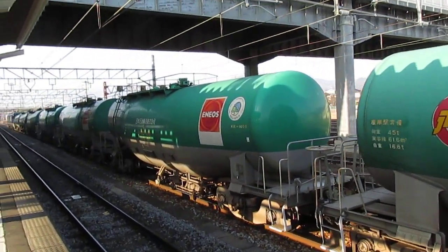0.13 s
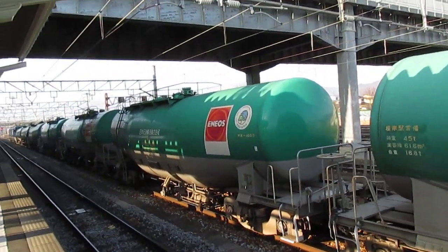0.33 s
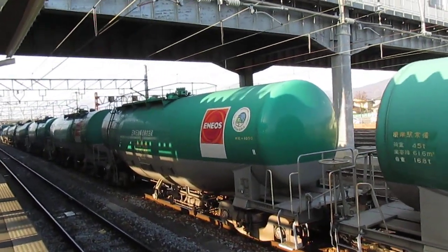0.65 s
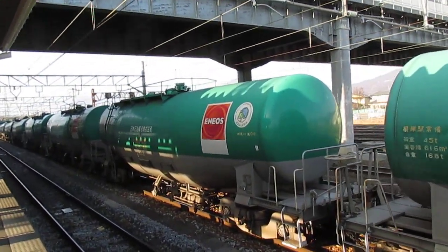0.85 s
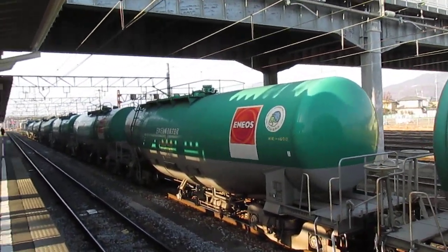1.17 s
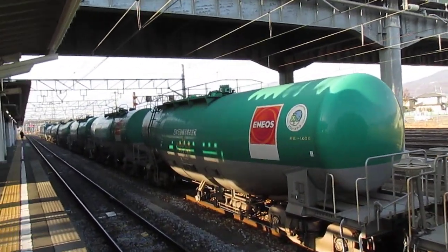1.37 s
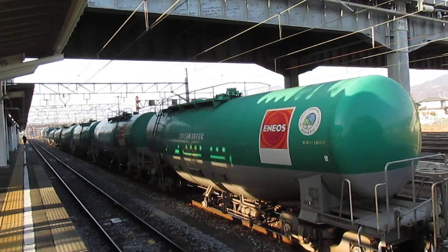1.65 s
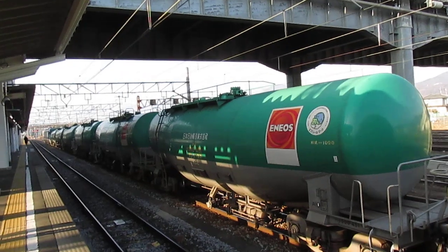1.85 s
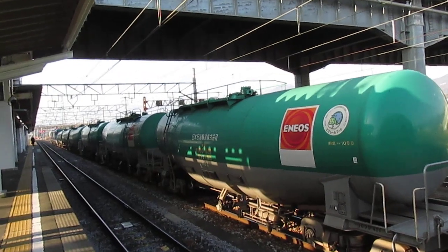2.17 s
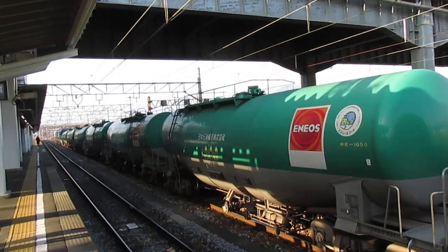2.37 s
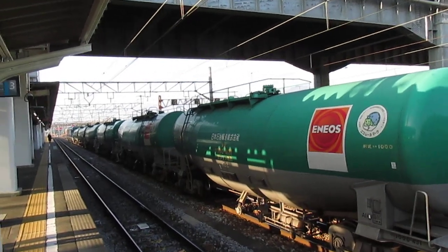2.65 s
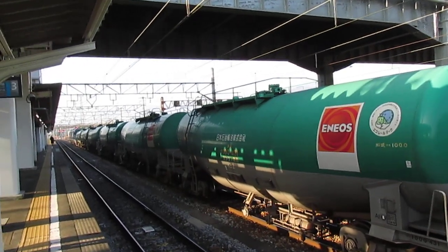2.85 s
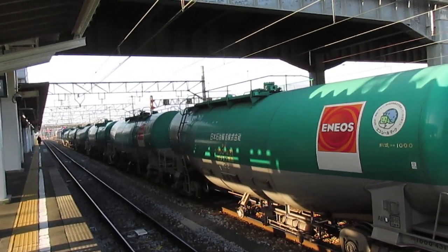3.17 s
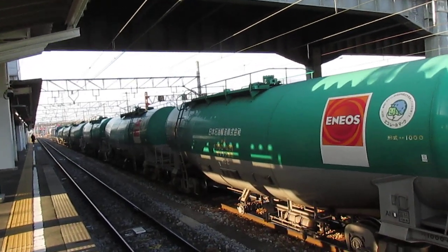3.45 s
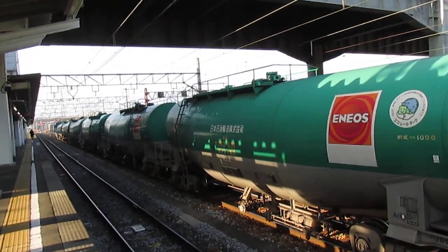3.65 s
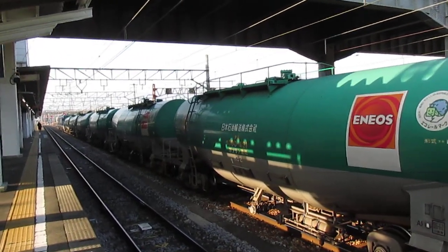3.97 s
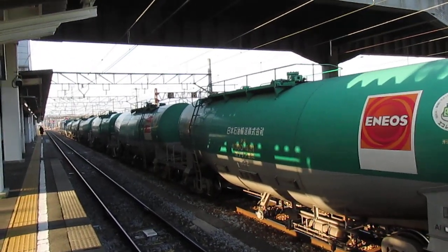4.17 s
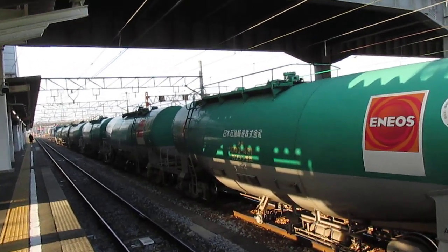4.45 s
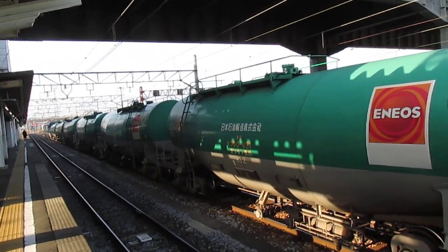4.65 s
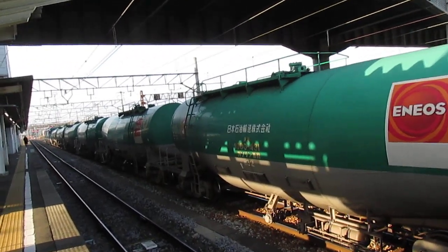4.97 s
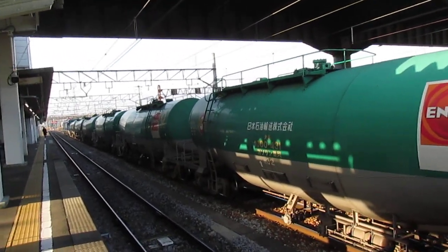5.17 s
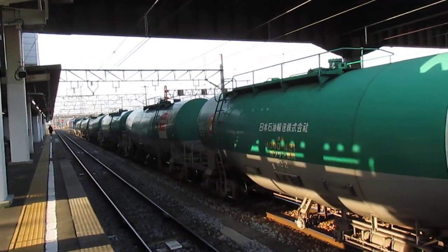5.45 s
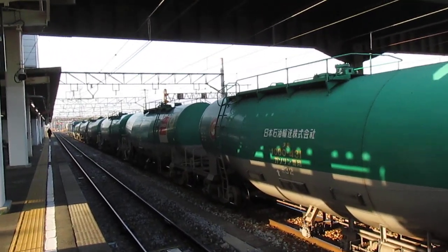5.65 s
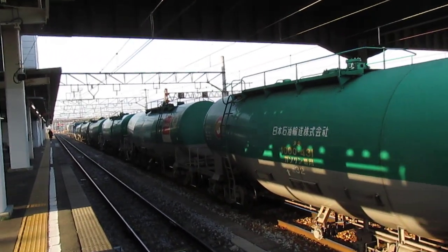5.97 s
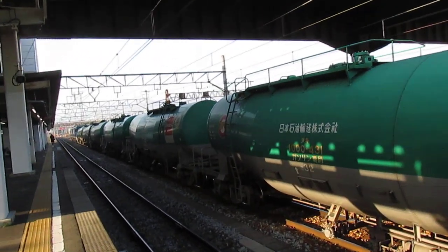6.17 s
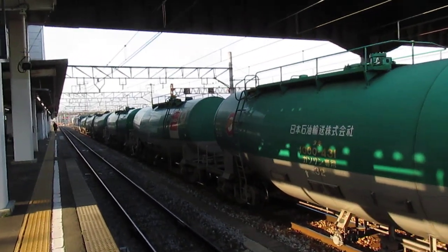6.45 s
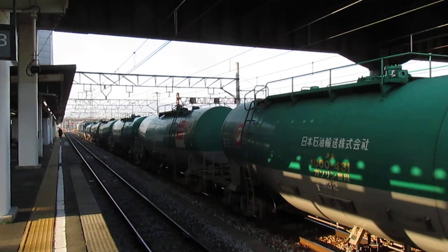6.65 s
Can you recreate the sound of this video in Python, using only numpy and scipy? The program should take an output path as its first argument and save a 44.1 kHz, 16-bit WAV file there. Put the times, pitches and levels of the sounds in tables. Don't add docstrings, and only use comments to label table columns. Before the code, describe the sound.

A bright hiss of escaping air from a standing tank train's brakes slowly dulls, joined by a breathy pipe hoot and thudding wind gusts.

```python
import sys
import numpy as np
from scipy import signal
from scipy.fft import rfft, irfft, next_fast_len
from scipy.io import wavfile
from scipy.ndimage import uniform_filter1d

SR = 44100
rng = np.random.default_rng(int(sys.argv[2]) if len(sys.argv) > 2 else 0)


def transcribe(u):
    v = np.clip(np.atleast_2d(u).T, -1, 1)
    q = np.round(v * 32767).astype(np.int16)
    wavfile.write(sys.argv[1], SR, q)


def invert_db(level):
    return 10 ** (np.asarray(level, dtype=float) / 20)


N = 300758
LONG = next_fast_len(N)
HZ = np.maximum(np.arange(LONG // 2 + 1) * SR / LONG, 1)

# frequency in Hz, density in dB per Hz.
YARD_COLOUR = [(18, -35), (30, -3.5), (254, -8), (352, -10.5), (509, -6), (792, -9), (900, 4), (1170, -39),
               (1980, -120)]
# frequency in Hz, density in dB per Hz.
SWELL_COLOUR = [(150, -39), (230, -4), (330, -8), (520, -2.5), (750, -9), (1100, -11)]
# start in seconds, hold in seconds, level in dB.
COUPLING_SWELLS = [
    (1.98, .02, -38),
    (4.1, .03, -49.5),
    (5.5, 0.4, -43),
]
# start in seconds, hold in seconds, level in dB.
GUSTS = [(.03, 0.0082, -38), (.865, .025, -34), (.98, 0.043, -33.5), (1.13, 0.016, -40), (1.23, 0.23, -46),
         (1.46, .04, -39), (2.05, 0.29, -44.5), (2.44, 0.012, -34), (2.55, .25, -39.5), (2.76, 0.04, -37),
         (2.9, .02, -45), (3.15, .1, -41), (3.35, .02, -47), (3.43, 0.22, -39.5), (3.92, 0.11, -38),
         (4.11, 0.028, -37.5), (4.28, 0.097, -40.5), (4.57, 0.027, -46), (4.69, 0.13, -44),
         (5.12, 0.2, -36), (5.18, 0.036, -34), (5.58, .04, -48), (5.85, .02, -42), (5.98, 0.033, -34),
         (6.1, .06, -40), (6.19, 0.044, -32.5), (6.39, .04, -35.5), (6.54, 0.033, -34), (6.6, 0.026, -44)]
# start in seconds, peak in dB, final pitch in Hz.
EDDIES = [(0.175, -60, 141), (0.865, -25.5, 117), (0.983, -35, 64), (1.415, -47, 75.4), (2.573, -34, 67.9),
          (2.782, -28.5, 84.5), (2.88, -42, 63.4), (3.417, -32, 77.6), (3.766, -44, 96.9),
          (3.928, -30, 116), (4.106, -31.5, 139), (4.286, -34, 81.6), (4.786, -37, 63), (5.156, -29, 161.6),
          (5.156, -38, 66.9), (5.836, -50, 75.2), (5.972, -29, 80.3), (6.18, -28, 95.5), (6.389, -35, 101),
          (6.541, -25, 73.5)]

# frequency in Hz, density in dB per Hz.
ROAR_COLOUR = [(320, -65), (550, -17), (615, -13), (680, -19), (797, -5.5), (895, -14), (974, -6),
               (1260, 1.5), (1480, -3), (1710, -12.5), (1950, -57), (2540, -37), (4290, -120)]
# frequency in Hz, density in dB per Hz.
UPPER_COLOUR = [(1030, -1), (1750, -1.5), (2310, -2), (2590, 4.5), (2780, 2.5), (3340, -10.5),
                (3710, -14.5), (3900, -10.5), (5070, -18), (8580, -120)]
# start in seconds, hold in seconds, level in dB.
UPPER_SWELLS = [
    (2.3, 0.99, -37.5),
    (5.2, 0.88, -38),
]
# time in seconds, pitch in Hz.
HOOT_HZ = [(0, 1170), (2.7, 1172), (3.7, 1148), (4.8, 1122), (5.4, 1110), (6.0, 1160), (6.82, 1170)]
# start in seconds, hold in seconds, level in dB.
HOOT_SPELLS = [
    (1.8, 0.23, -36.5),
    (2.8, 1.77, -28),
    (3.55, 0.15, -28),
    (4.5, 0.25, -31.5),
    (5.0, 0.49, -29.5),
    (6.2, .7, -33.5),
]
# start in seconds, hold in seconds, level in dB.
SHOULDER_SPELLS = [
    (1.7, 0.41, -36.5),
    (2.7, 0.44, -37),
    (4.0, 0.42, -35),
    (4.8, 1.2, -33.5),
]

# time in seconds, hiss level in dB.
FAR_DB = [(0, -55), (1, -35), (2, -32.5), (4, -33), (5.1, -32.5), (5.6, -36), (6.82, -43.5)]
# frequency in Hz, density in dB per Hz.
FAR_COLOUR = [(3000, -24), (3300, -11), (3700, -11), (4500, -10), (5150, -1), (6000, -5.5), (7000, -6),
              (7600, -1.5), (9200, -2), (10200, -9.5), (11000, -6), (11900, -8.5), (13000, -6),
              (15800, -11)]
# time in seconds, jet level in dB.
JET_DB = [(0, -25.5), (1.2, -28.5), (1.9, -31), (3.1, -39.5), (4.2, -49), (5.4, -41.5), (6.82, -39.5)]
# frequency in Hz, density in dB per Hz.
JET_COLOUR = [(3000, -30), (3300, -18), (3850, -21), (4200, -7), (4700, -3.5), (5250, -1), (6300, -2.5),
              (7000, -7), (9200, -5), (10250, -11), (11000, -6.5), (12000, -8.5), (13500, -3.5),
              (15800, -7.5)]
# time in seconds, pitch in Hz.
MID_HZ = [(0, 5180), (.7, 5176), (1.7, 5340), (2.8, 5320), (3.6, 5208), (5.5, 5195), (6.2, 5210),
          (6.82, 5230)]
# start in seconds, hold in seconds, level in dB.
MID_SPELLS = [(.7, 0.94, -36.5), (1.6, .6, -36), (2.9, 0.62, -32), (3.9, 0.36, -37.5), (4.5, 0.98, -40.5),
              (6.2, 0.084, -41)]
# time in seconds, pitch in Hz.
TOP_HZ = [(0, 10920), (2, 10920), (3, 10850), (6.82, 10820)]
# start in seconds, hold in seconds, level in dB.
TOP_SPELLS = [(0, .05, -38), (.6, .5, -49), (1.4, .8, -37.5), (2.6, 0.86, -45), (5.3, .05, -46),
              (5.8, 1.2, -50)]
# start in seconds, end in seconds, first pitch in Hz, last pitch in Hz, level in dB.
LEAKS = [(0, 1.7, 6400, 5960, -53), (0, 1.6, 13550, 13300, -41), (0, 1.0, 14650, 14550, -42),
         (0, 2.5, 9450, 9150, -45), (.2, 1.4, 13000, 12650, -46), (.6, 1.6, 15050, 14850, -39),
         (.7, 1.2, 8500, 8350, -48), (1.4, 2.9, 2120, 2090, -41.5), (2.0, 2.64, 9160, 9160, -41),
         (2.8, 3.7, 12750, 12700, -46), (2.8, 4.2, 8400, 8050, -45), (3.2, 5.2, 7700, 7400, -42.5),
         (3.3, 4.7, 15200, 15000, -50), (3.9, 4.9, 14250, 14500, -49), (4.7, 5.8, 15000, 14900, -46),
         (5.0, 6.3, 12850, 12600, -52)]

# time in seconds, left lag of the jet in samples.
LAG = [(0, -.8), (1.2, -.5), (2.2, .6), (3.6, 1.0), (5.0, 1.7), (6.2, 3.3), (6.82, 3.6)]
# frequency in Hz, common share of power from 0 to 1.
LIKENESS = [(60, 0.75), (500, 0.97), (1200, 0.73), (2000, 0.67), (3200, 0), (4500, 0.44), (6200, 0.45),
            (7300, 0.22), (11000, 0.57), (15000, 0.43)]
# delay in ms, change of delay in % per
ECHOES = [(.8, 4.0, .3), (1.7, 2.2, -.5), (2.6, 3.4, .3), (3.9, 1.2, 0), (5.3, 2.1, -.4), (7.1, .7, .6),
          (9.7, 1.5, -.6), (13.4, .5, .3)]

YARD_DB = -44
ROAR_DB, ROAR_RISE_DB_PER_S, ROAR_YIELD_DB, HOOT_FULL_DB = -30.5, 0.28, 5, -24.5
UPPER_DB, UPPER_HOLD_S, UPPER_SAG_DB_PER_S = -31.5, 0.39, 1.43
SHOULDER_HZ = 1400
LEAK_WIDTH_SHARE = 0.017
JET_PAN_DB, JET_PAN_DB_PER_LAG, JET_ECHO_DB = 1.5, -0.5, -7
PIPE_PAN_DB, PIPE_PAN_DB_PER_LAG, PIPE_ECHO_DB = -1.8, -0.62, -11
PIPE_LAG_SHIFT_SAMPLES, PIPE_LAG_SCALE = -.7, 1.25
DIRECT_DB, OFF_AXIS_FROM_LAG, OFF_AXIS_DB_PER_LAG = 2.5, 0.53, 1.5
NOTCH_HZ, NOTCH_WIDTH_HZ = 7881, 190


def in_time(rows):
    s, *columns = np.transpose(rows)
    return [np.interp(np.arange(N) / SR, s, c) for c in columns]


def at_hz(points, outside=None):
    hz, value = np.transpose(points)
    return np.interp(np.log(HZ), np.log(hz), value, left=outside, right=outside)


def rms_one(x):
    return x / np.sqrt(np.mean(x ** 2) + 1e-20)


def drift(rate_hz, size=N):
    r = np.exp(-80 * np.pi * rate_hz / SR)
    white = rng.standard_normal(size // 40 + 2002)
    slow = signal.lfilter([1], [1, -2 * r, r * r], white)[2000:]
    return np.interp(np.arange(size) / 40, np.arange(len(slow)), rms_one(slow))


def spells(rows, rise_db_per_s, fall_db_per_s, rest_db):
    t = np.arange(0, N + 40, 40) / SR
    start, hold, db = np.transpose(rows)[..., None]
    rise_db = rise_db_per_s * np.maximum(start - t, 0)
    fall_db = fall_db_per_s * np.maximum(t - start - hold, 0)
    power = np.sum(invert_db(2 * (db - rise_db - fall_db)), axis=0) + invert_db(2 * rest_db)
    return np.interp(np.arange(N) / SR, t, 10 * np.log10(power))


def hiss(gain):
    alike = np.clip(at_hz(LIKENESS), 0, 1)
    spectrum = rfft(rng.standard_normal((3, LONG))) * gain
    parts = irfft(spectrum * np.sqrt([alike, 1 - alike, 1 - alike]), LONG)[:, :N]
    return parts / np.sqrt(np.mean(parts[0] ** 2 + parts[1] ** 2))


def coloured(colour, level_db, flicker_db):
    flutter_db = flicker_db * (drift(6.6) + drift(1.5))
    return invert_db(level_db + flutter_db) * hiss(invert_db(at_hz(colour, outside=-90)))


def whistle(hz, level_db, width_hz, flicker_db):
    n, long = len(hz), next_fast_len(len(hz))
    offset_hz = np.arange(long // 2 + 1) * SR / long
    band = 1 / (1 + (2 * offset_hz / width_hz) ** 2)
    slow = irfft(rfft(rng.standard_normal((2, 3, long))) * band, long)[..., :n]
    phase = 2 * np.pi * np.cumsum(hz) / SR
    parts = rms_one(slow[0] * np.cos(phase) + slow[1] * np.sin(phase))
    alike = np.clip(np.interp(np.mean(hz), *np.transpose(LIKENESS)), 0, 1)
    level = invert_db(level_db + flicker_db * drift(9.4, size=n))
    return level * parts * np.sqrt([[alike], [1 - alike], [1 - alike]])


def at_pair(parts, pan_db, lag, direct_db, echo_db):
    fine = irfft(rfft(parts[0], LONG), 8 * LONG) * 8
    now = np.arange(N)

    def delayed(samples):
        return fine.take((8 * (N + now - samples)).astype(int), mode="wrap")

    ports = []
    for side, scattered in zip((1, -1), parts[1:]):
        port = delayed(side * lag / 2)
        for ms, slide, extra in ECHOES:
            path = ms * SR / 1000 * (1 + slide / 100 * now / SR)
            port += invert_db(echo_db) * delayed(path + side * (lag + extra) / 2)
        port /= np.sqrt(1 + len(ECHOES) * invert_db(2 * echo_db))
        mixed = port * invert_db(direct_db / 4) + scattered * invert_db(-direct_db * .75)
        ports.append(mixed * invert_db(side * pan_db / 2))
    return np.array(ports)


def yard():
    swell_db = spells(COUPLING_SWELLS, rise_db_per_s=150, fall_db_per_s=20, rest_db=-53.5)
    rumble = coloured(YARD_COLOUR, YARD_DB, flicker_db=0.6)
    rumble = rumble + coloured(SWELL_COLOUR, swell_db, flicker_db=1.1)
    return (rumble[0] + rumble[1:]) * invert_db(np.array([[-.7], [.7]]))


def wind():
    gust_db = spells(GUSTS, rise_db_per_s=450, fall_db_per_s=300, rest_db=-63.5)
    white = rng.standard_normal((2, N))
    deep_band = signal.butter(2, [26, 100], "band", fs=SR, output="sos")
    bright_band = signal.butter(3, [80, 180], "band", fs=SR, output="sos")
    deep = rms_one(signal.sosfilt(deep_band, white[0]))
    bright = rms_one(signal.sosfilt(bright_band, white[1]))
    lumps = deep + invert_db(.5 * (gust_db + 33.5) - 15.5) * bright
    lumps /= np.sqrt(uniform_filter1d(lumps ** 2, size=2200) + 0.051)
    push = invert_db(gust_db + 4.0) * lumps
    t = np.arange(int(.06 * SR)) / SR
    for s, peak_db, hz in EDDIES:
        phase = 2 * np.pi * hz * (t + .006 * (1 - np.exp(-t / .006)))
        thud = invert_db(peak_db + 3.5) * np.sin(phase) * np.exp(-t / 0.047)
        i = int(s * SR)
        push[i:i + len(t)] += thud[:N - i]
    return push * [[-.37], [1]]


def pipe(lag):
    t = np.arange(N) / SR
    hoot_db = spells(HOOT_SPELLS, rise_db_per_s=35, fall_db_per_s=25, rest_db=-61)
    roar_db = ROAR_DB + ROAR_RISE_DB_PER_S * t - ROAR_YIELD_DB * invert_db(hoot_db - HOOT_FULL_DB)
    roar = coloured(ROAR_COLOUR, roar_db, flicker_db=0.05)
    sinking_db = UPPER_DB - UPPER_SAG_DB_PER_S * np.maximum(t - UPPER_HOLD_S, 0)
    again_db = spells(UPPER_SWELLS, rise_db_per_s=12, fall_db_per_s=5.5, rest_db=-56)
    upper_db = 10 * np.log10(invert_db(2 * sinking_db) + invert_db(2 * again_db)) + 1.0
    upper = coloured(UPPER_COLOUR, upper_db, flicker_db=0.8)
    hoot = whistle(*in_time(HOOT_HZ), hoot_db, width_hz=59, flicker_db=0.0)
    shoulder_db = spells(SHOULDER_SPELLS, rise_db_per_s=12, fall_db_per_s=10, rest_db=-48)
    shoulder = whistle(np.full(N, SHOULDER_HZ), shoulder_db, width_hz=170, flicker_db=1.0)
    return roar + upper + hoot + shoulder, PIPE_PAN_DB + PIPE_PAN_DB_PER_LAG * lag


def leaks():
    out = np.zeros((3, N))
    for start, end, first_hz, last_hz, level_db in LEAKS:
        i, j = int(start * SR), int(end * SR)
        swell = np.sin(np.linspace(0, np.pi, j - i)).clip(0) ** .8
        glide_hz = np.linspace(first_hz, last_hz, j - i)
        out[:, i:j] += swell * whistle(glide_hz, level_db, LEAK_WIDTH_SHARE * first_hz, flicker_db=1.0)
    return out


def vent(lag):
    near = coloured(JET_COLOUR, *in_time(JET_DB), flicker_db=0.05)
    far = coloured(FAR_COLOUR, *in_time(FAR_DB), flicker_db=0.22)
    mid_db = spells(MID_SPELLS, rise_db_per_s=14, fall_db_per_s=12, rest_db=-49.5)
    top_db = spells(TOP_SPELLS, rise_db_per_s=28, fall_db_per_s=19, rest_db=-66)
    mid = whistle(*in_time(MID_HZ), mid_db, width_hz=460, flicker_db=.8)
    top = whistle(*in_time(TOP_HZ), top_db, width_hz=260, flicker_db=1)
    return near + far + mid + top + leaks(), JET_PAN_DB + JET_PAN_DB_PER_LAG * lag


def scene():
    lag, = in_time(LAG)
    pipe_lag = PIPE_LAG_SCALE * lag + PIPE_LAG_SHIFT_SAMPLES
    direct_db = DIRECT_DB - OFF_AXIS_DB_PER_LAG * np.maximum(lag - OFF_AXIS_FROM_LAG, 0)
    jets = at_pair(*vent(lag), lag, direct_db, JET_ECHO_DB)
    air = at_pair(*pipe(lag), pipe_lag, direct_db, PIPE_ECHO_DB)
    return jets + air + yard() + wind()


def band_limit(x):
    return signal.sosfilt(signal.butter(12, 15750, fs=SR, output="sos"), x)


def record(dry):
    notch = signal.iirnotch(NOTCH_HZ, NOTCH_HZ / NOTCH_WIDTH_HZ, fs=SR)
    notched = signal.lfilter(*notch, dry)
    return band_limit(notched)


dry = scene()
out = record(dry)
transcribe(out)
```